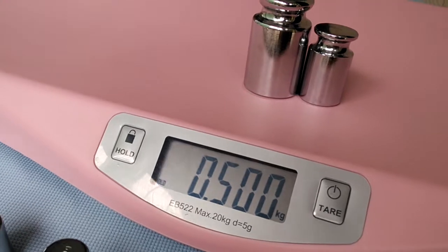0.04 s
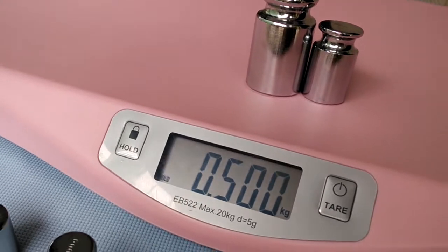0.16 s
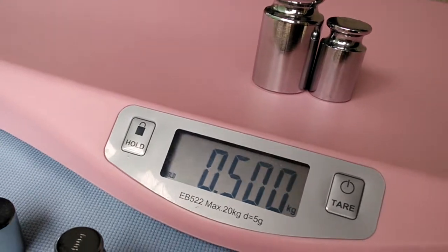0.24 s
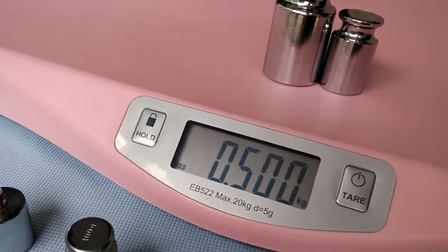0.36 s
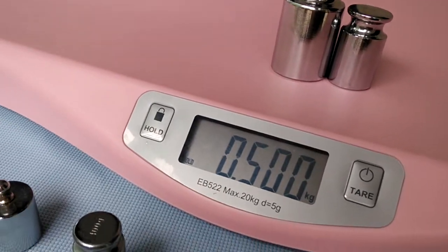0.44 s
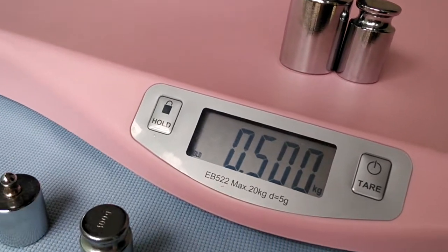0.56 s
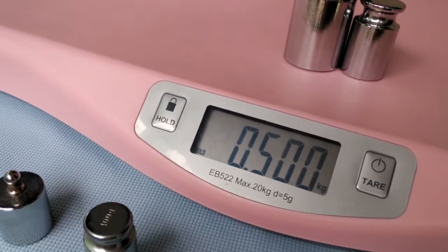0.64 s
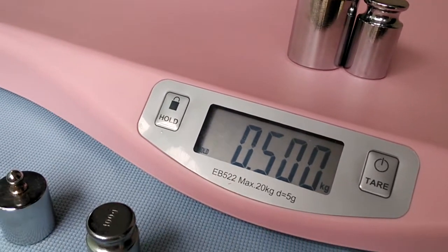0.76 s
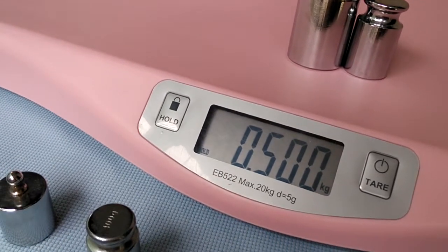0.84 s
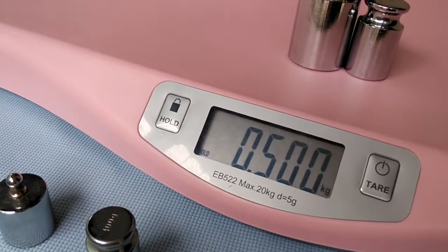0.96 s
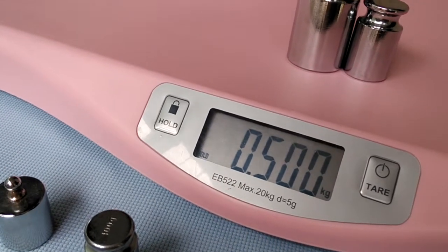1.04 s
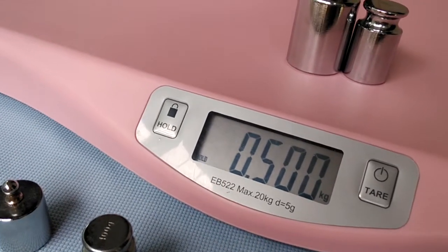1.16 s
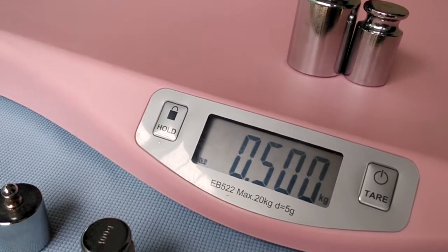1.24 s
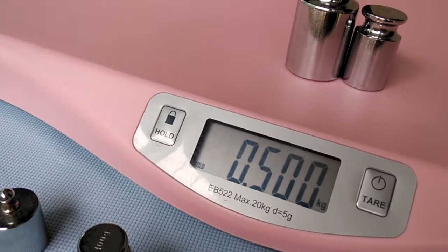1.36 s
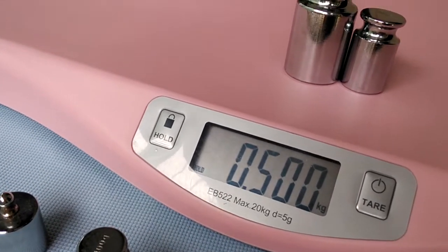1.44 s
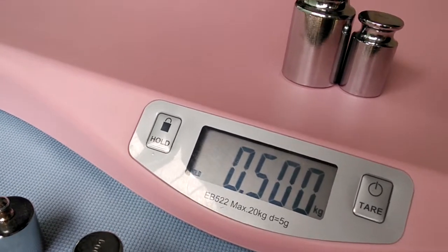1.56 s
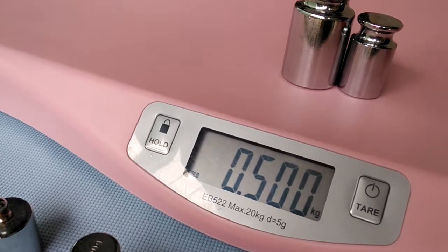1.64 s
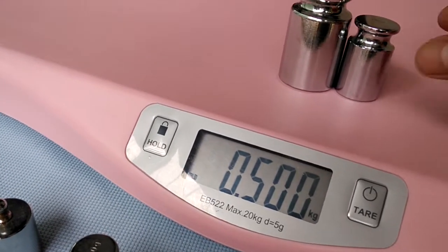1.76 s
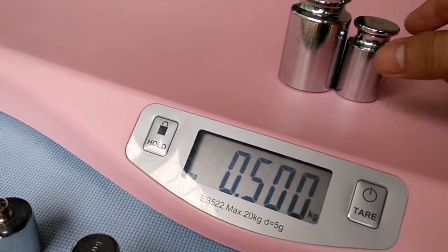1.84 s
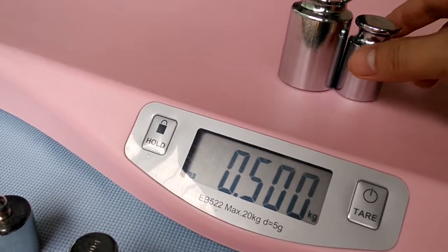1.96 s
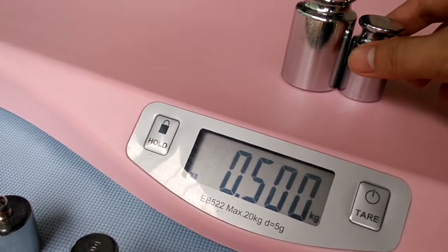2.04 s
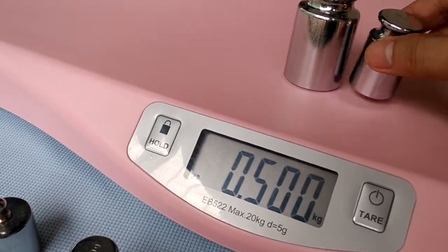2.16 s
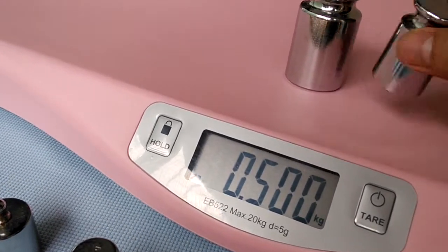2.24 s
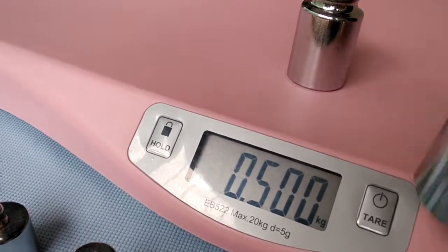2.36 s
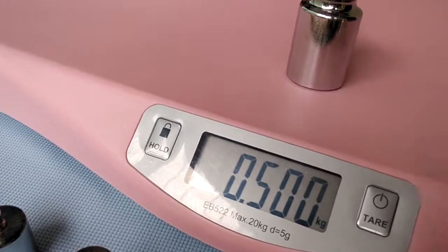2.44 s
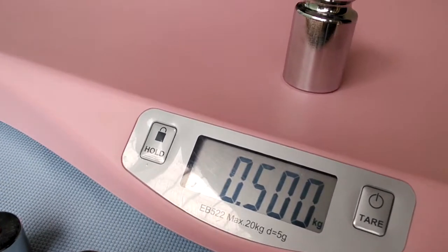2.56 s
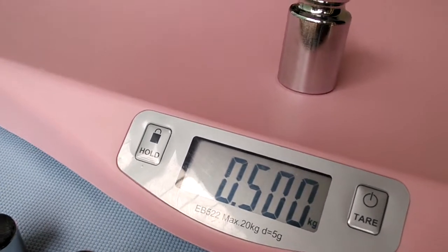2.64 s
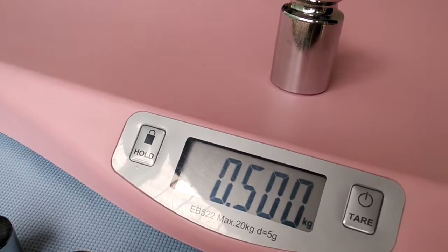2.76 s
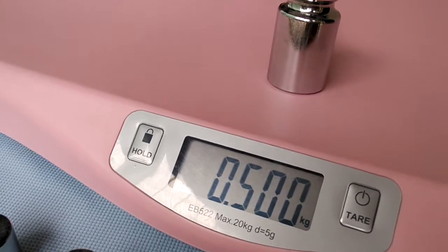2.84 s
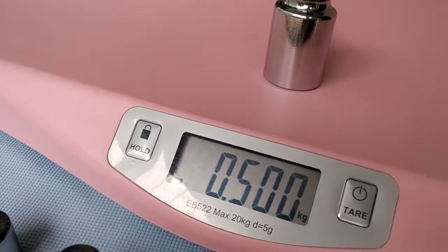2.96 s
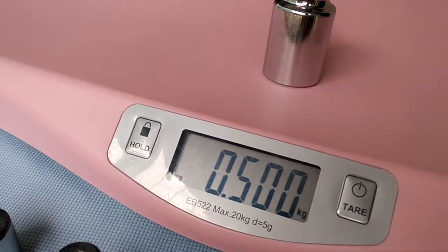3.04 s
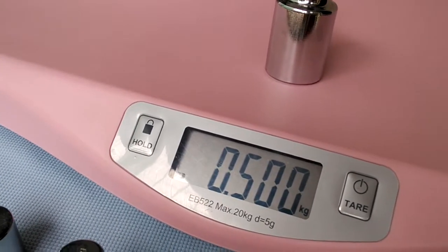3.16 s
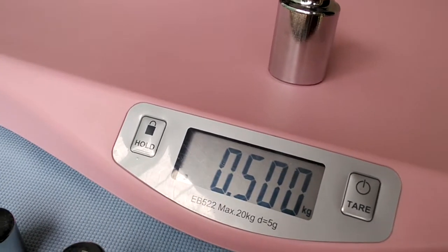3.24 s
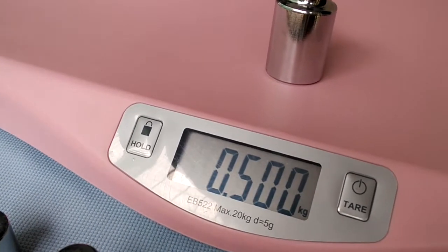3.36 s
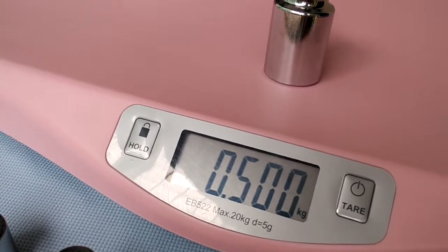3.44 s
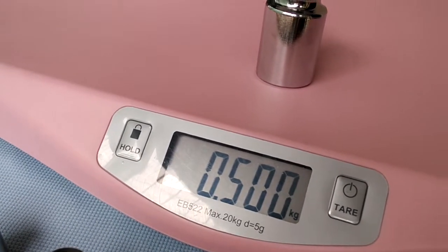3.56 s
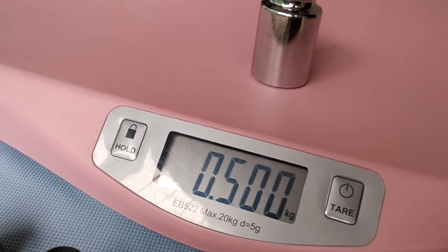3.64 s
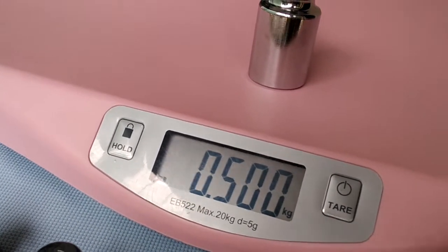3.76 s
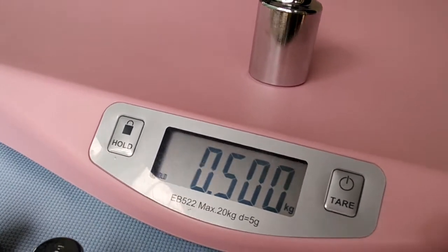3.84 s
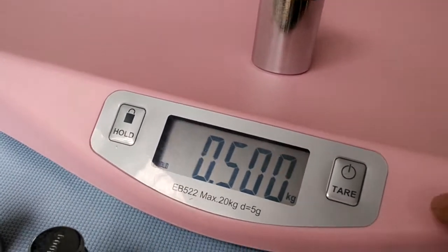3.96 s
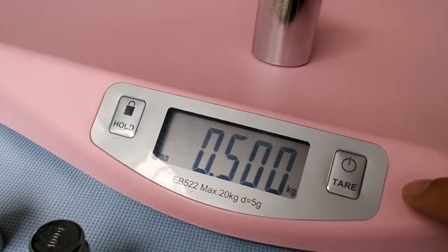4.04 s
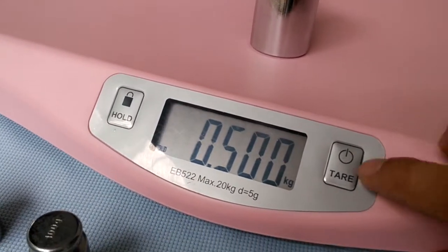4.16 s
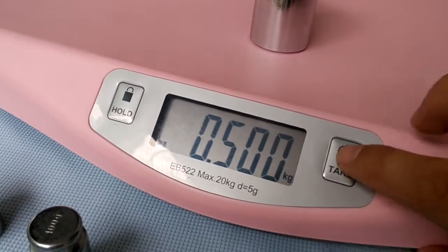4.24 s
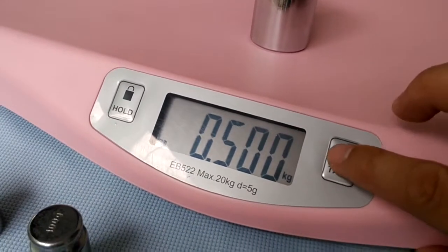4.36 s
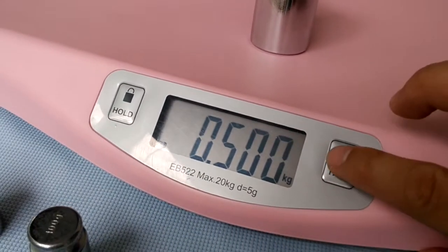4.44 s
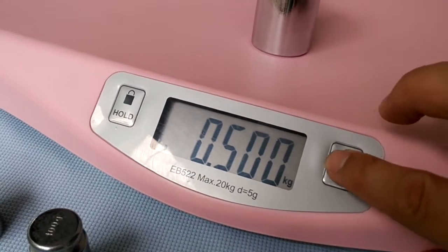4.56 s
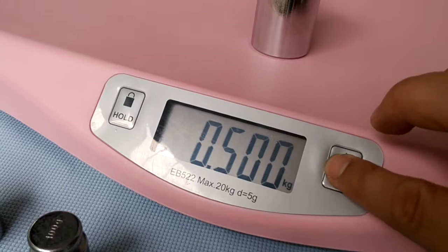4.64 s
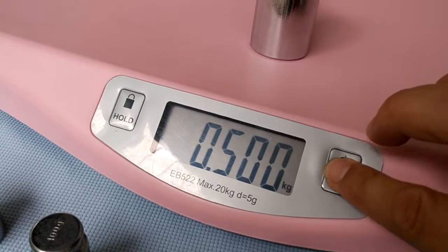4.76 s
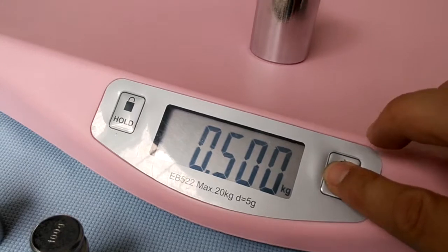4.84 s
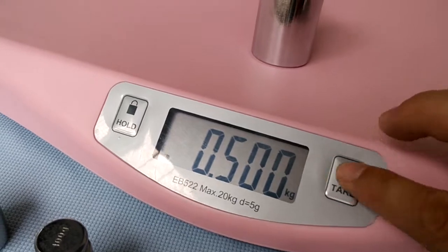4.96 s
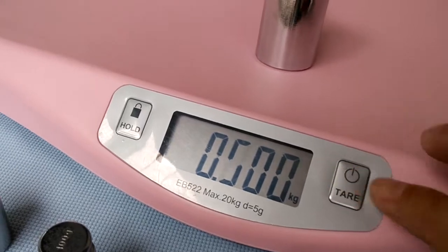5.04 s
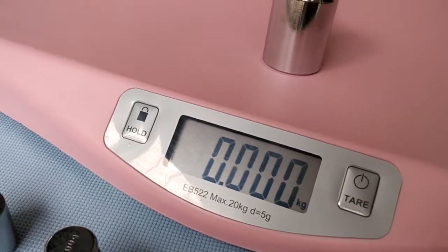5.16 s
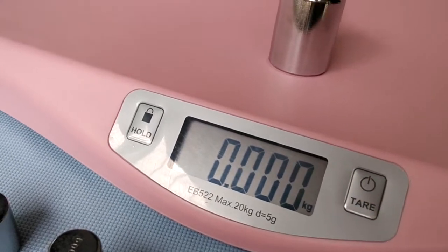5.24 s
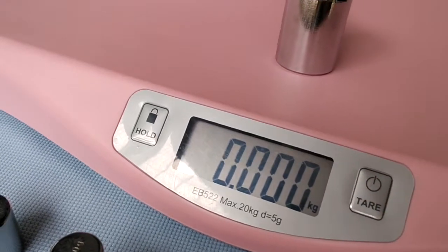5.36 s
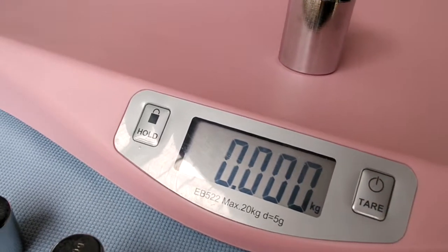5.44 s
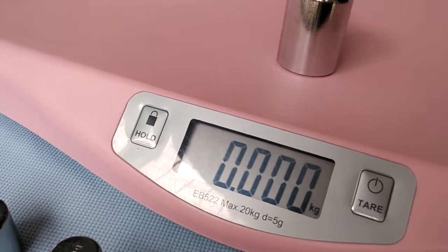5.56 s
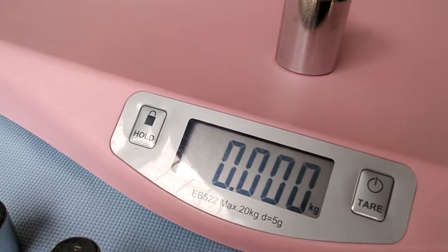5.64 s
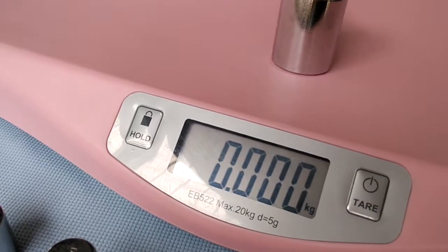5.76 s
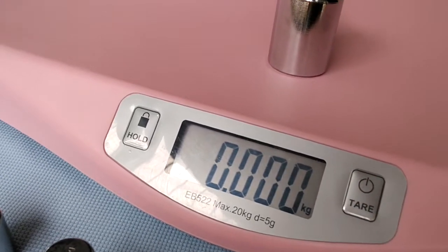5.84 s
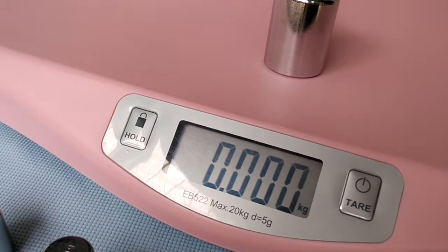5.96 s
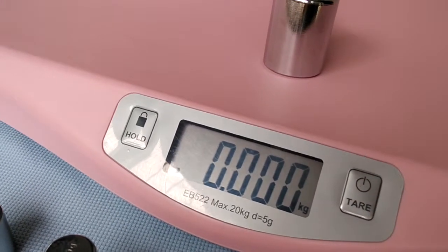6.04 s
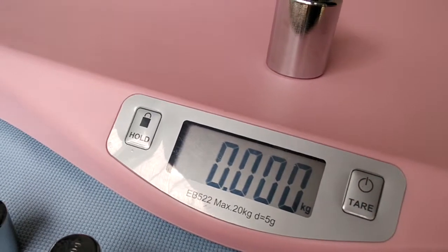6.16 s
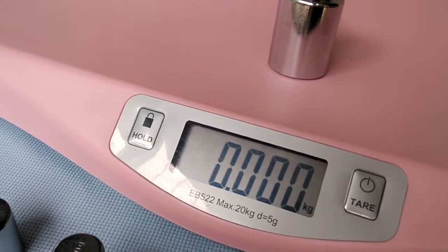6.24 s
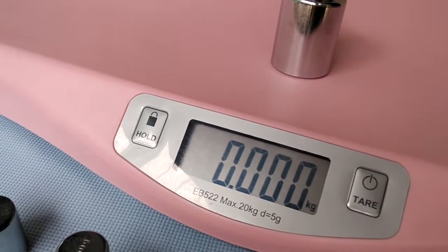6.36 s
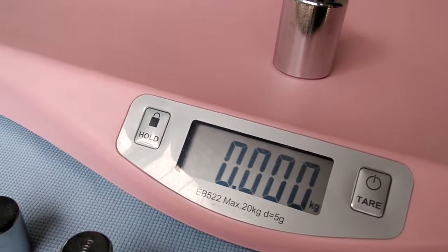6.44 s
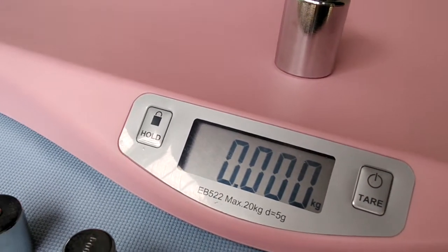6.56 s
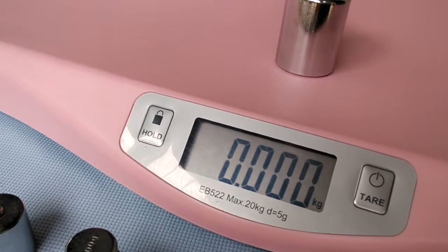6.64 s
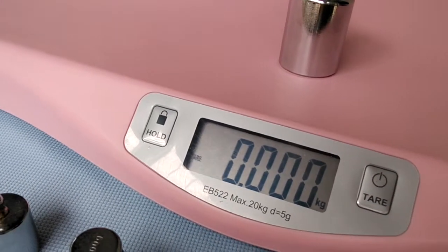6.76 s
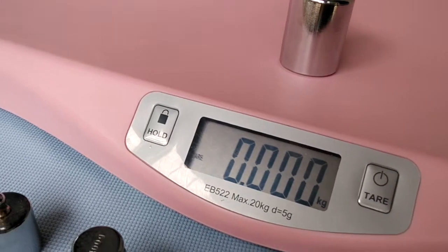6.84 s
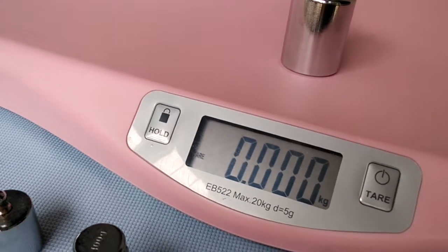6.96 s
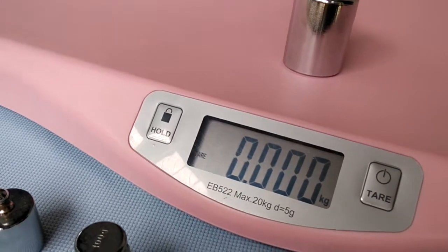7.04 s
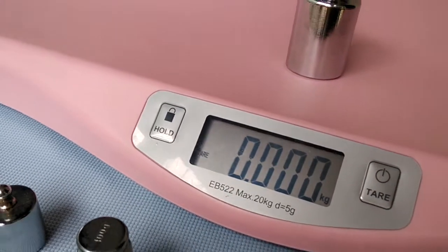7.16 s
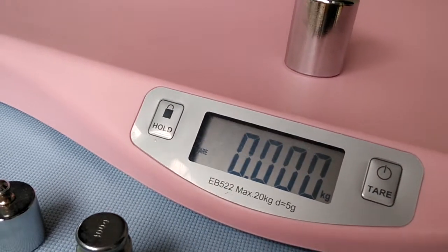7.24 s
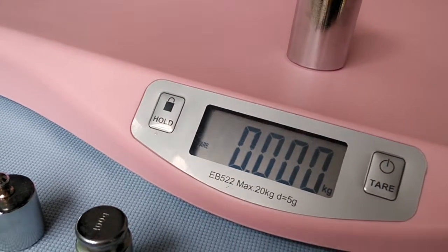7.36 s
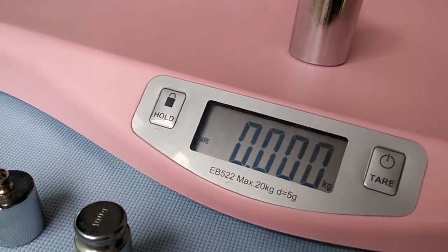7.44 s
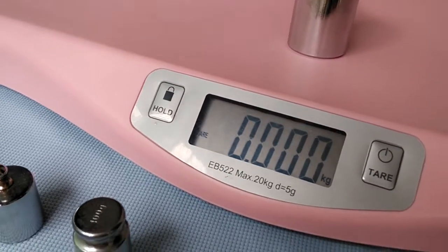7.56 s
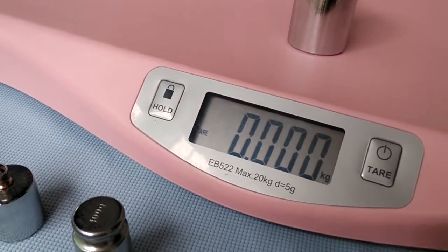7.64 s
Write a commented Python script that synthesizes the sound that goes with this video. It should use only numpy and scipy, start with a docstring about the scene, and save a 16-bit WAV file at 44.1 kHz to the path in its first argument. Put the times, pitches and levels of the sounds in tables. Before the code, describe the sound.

Quiet room near a street, small birds trilling outside, one low hollow thump of a metal weight, then a crisp two-part button press.

```python
"""Beside an open window, a finger presses and releases the plastic button of a small scale: sharp pulses
ring a dome, then echo. Steel weights lifted and set down ring low tray modes; ticks are noise puffs.
Outside: rumble and hiss (shaped noise), two narrow insect bands and a broader hiss near 2400 Hz that
swells late, a fading horn (throbbing partials), small birds (gliding tones) smeared by echoes.
A phone microphone, bright near 8 kHz, is close; its gain control ducks after loud clicks."""
import sys
import numpy as np
from scipy import signal
from scipy.fft import rfft, irfft
from scipy.io import wavfile
from scipy.ndimage import uniform_filter1d

SR = 44100
rng = np.random.default_rng(int(sys.argv[2]) if len(sys.argv) > 2 else 0)


def master_out(mix):
    """Clip the mix to full scale and print it as 16-bit PCM to the path in sys.argv[1]."""
    frames = np.transpose(np.atleast_2d(mix))
    ceiling = np.clip(frames, -1, 1)
    pcm = np.round(ceiling * 32767).astype(np.int16)
    wavfile.write(sys.argv[1], SR, pcm)


def ratio_of_db(decibels):
    """Turn decibels (scalar or array-like) into linear amplitude factors; 0 dB maps to 1."""
    return 10 ** (np.asarray(decibels, float) / 20)


N = 339173


def read(points, hz):
    """Value of a spectrum on a log-frequency axis."""
    f, value = np.transpose(points)
    return np.interp(np.log(hz + 1), np.log(f + 1), value)


def evened(x):
    """Scales to rms 1."""
    return x / np.sqrt(np.mean(x ** 2) + 1e-20)


def add(mix, start_s, sound):
    """Mixes a sound in at start_s."""
    part = mix[max(round(start_s * SR), 0):][:len(sound)]
    part += sound[:len(part)]


def resonate(x, hz, width_hz):
    """One resonance of gain 1, fixed or gliding: shift to 0 Hz, low-pass, shift back."""
    turn = np.exp(2j * np.pi * np.cumsum(hz * np.ones(len(x))) / SR)
    r = np.exp(-np.pi * width_hz / SR)
    return 2 * (turn * signal.lfilter([1 - r], [1, -r], x / turn)).real


def slow(rate_hz, count):
    """Smooth random curve of rms 1: sines of random phase up to rate_hz."""
    t = np.arange(count) / SR
    rates = np.geomspace(rate_hz / 20, rate_hz, 16)
    return evened(sum(np.sin(2 * np.pi * (f * t + rng.random())) / np.sqrt(f) for f in rates))


def coloured(points):
    """Steady noise of the given spectrum, rms 1."""
    gain = ratio_of_db(read(points, np.fft.rfftfreq(N, 1 / SR)))
    return evened(irfft(rfft(rng.standard_normal(N)) * gain, N))


def causal(points, size=1024):
    """Minimum-phase impulse: the given colour with the shortest possible ring, peak 1."""
    level_db = np.maximum(read(points, abs(np.fft.fftfreq(size, 1 / SR))), -100)
    log_gain = np.log(ratio_of_db(level_db))
    pulse = np.fft.ifft(np.exp(log_gain - 1j * signal.hilbert(log_gain).imag)).real[:size // 2]
    return pulse / abs(pulse).max()


# decay by band before stretching: (frequency [Hz], t60 [s])
ROOM_DECAY = [(200, 0.19), (1000, 0.16), (3000, 0.13), (8000, 0.23), (14000, 0.058)]


def tail(points, stretch, rise_s):
    """Diffuse reverberation: noise dying band by band at the room's t60 times stretch, energy 1."""
    hz, t, z = signal.stft(rng.standard_normal(SR), SR, nperseg=128)
    t60_s = stretch * read(ROOM_DECAY, hz)[:, None]
    z = z * ratio_of_db(read(points, hz)[:, None] - 60 * t / t60_s)
    out = signal.istft(z, SR, nperseg=128)[1][:SR]
    out = out * (1 - np.exp(-np.arange(SR) / SR / rise_s))
    return out / np.linalg.norm(out)


# street and microphone hiss colour: (frequency [Hz], relative level [dB])
HISS_COLOUR = [(300, -15.5), (420, -1), (600, -4), (900, -8), (1600, -17), (3900, -24), (5700, -25),
               (7000, -23.5), (8000, -16), (9800, -13), (11300, -13.5), (12300, -25), (13800, -15.5),
               (14500, -24.5)]
# far traffic colour: (frequency [Hz], relative level [dB])
RUMBLE_COLOUR = [(8.8, -33), (15, -7.5), (43, 1.5), (55, -3.5), (92, -14), (155, -10), (196, -17.5),
                 (234, -15), (400, -21), (520, -56.5), (880, -120)]
# slow random wandering of the rumble level: (time [s], level [dB])
RUMBLE_LEVEL = [(0.0, -54), (0.54, -57.5), (1.2, -53.5), (1.82, -57.5), (3.8, -54), (5.3, -57), (6.0, -54),
                (7.0, -56.5), (7.69, -55)]


def air():
    """Hiss with patches, a slow swell and treble flicker, over lumpy rumble."""
    hiss_db, swell_db, patch_db, flicker_db, lump_db = -65, 0.5, 1.0, 1.6, 1.0
    hz, _, z = signal.stft(coloured(HISS_COLOUR), SR, nperseg=512, noverlap=384)
    patches = rng.standard_normal(z.T.shape).T
    patches = evened(uniform_filter1d(uniform_filter1d(patches, 8, 0), 24, 1))
    flicker = evened(uniform_filter1d(rng.standard_normal(z.shape[1]), 6))
    flicker = flicker * np.clip(hz / 8000, 0, 1)[:, None]  # grows with frequency
    swell = slow(3., count=z.shape[1] * 128)[::128]
    gain = ratio_of_db(patch_db * patches + swell_db * swell + flicker_db * flicker)
    hiss = signal.istft(z * gain, nperseg=512, noverlap=384)[1][:N]
    rumble_db = np.interp(np.arange(N) / SR, *np.transpose(RUMBLE_LEVEL))
    rumble = ratio_of_db(rumble_db + lump_db * slow(7.4, count=N)) * coloured(RUMBLE_COLOUR)
    return ratio_of_db(hiss_db) * hiss + rumble


# two narrow insect bands, and a broader hiss near 2400 Hz that swells late:
# (width of each of two resonances [Hz], throb rms [dB], curve of (time [s], centre [Hz], level [dB]))
HISS_BANDS = [(113, 2.3, [(0, 4550, -80), (.4, 4540, -80), (1.1, 4680, -88), (2.5, 4580, -93.5),
              (3.3, 4660, -93), (7.69, 4630, -97)]), (130, 2, [(0, 9600, -77.5), (3.8, 9550, -76.5),
              (7.69, 9560, -81)]), (613, 2.1, [(0, 2400, -90), (3, 2280, -88), (5, 2390, -81),
              (6.2, 2300, -77), (7, 2350, -79.5), (7.69, 2400, -86)])]


def insects_and_hiss():
    """Noise through paired resonances that throb and drift: two narrow insects, one broader hiss."""
    t, out = np.arange(N) / SR, np.zeros(N)
    for width_hz, throb_db, rows in HISS_BANDS:
        s, *columns = np.transpose(rows)
        hz, level_db = (np.interp(t, s, c) for c in columns)
        band = resonate(rng.standard_normal(N), hz, width_hz)
        band = evened(resonate(band, hz, width_hz))
        out += band * ratio_of_db(level_db + throb_db * slow(30., count=N))
    return out


# (frequency [Hz], peak level [dB], fade [dB/s], throb depth [dB])
HORN_PARTIALS = [(2950, -75, 40, 8), (3305, -71, 19, 25)]


def horn():
    """Far partials that swell, then die among the houses, throbbing together."""
    length_s, peak_s, swell_db_per_s = 1.1, 0.19, 25
    throb_s, first_crest_s, sharpness = 0.126, 0.085, 4.5
    t, out = np.arange(0, length_s, 1 / SR), np.zeros(N)
    dip = abs(np.sin(np.pi * (t - first_crest_s) / throb_s)) ** sharpness
    before_s, after_s = np.maximum(peak_s - t, 0), np.maximum(t - peak_s, 0)
    for hz, peak_db, fade_db_per_s, depth_db in HORN_PARTIALS:
        level_db = peak_db - swell_db_per_s * before_s - fade_db_per_s * after_s - depth_db * dip
        add(out, 0, ratio_of_db(level_db) * np.sin(2 * np.pi * hz * t))
    return out


def sing(t, hz, level_db, warble_hz):
    """The bird's voice: mostly second harmonic, with quick downward dips in pitch that thin it."""
    dips_per_s, jitter_hz, flutter_db = 40, 35, 1.8
    dip_loss_db_per_hz, edge_s = 0.007, 0.006
    # the pitch rests high and dips briefly
    dips = abs(np.sin(np.pi * dips_per_s * t + 1.7 * slow(30., count=len(t)))) ** 7.7
    pitch_hz = hz - warble_hz * dips + jitter_hz * slow(200.6, count=len(t))
    angle = 2 * np.pi * np.cumsum(pitch_hz) / SR
    fundamental_db = -18 + np.minimum(hz - 3600, 0) / 25  # the beak passes only a high fundamental
    voice = np.sin(2 * angle) + ratio_of_db(fundamental_db) * np.sin(angle)
    edges = np.clip(np.minimum(t, t[-1] - t) / edge_s, 0, 1)
    level_db = level_db - dip_loss_db_per_hz * warble_hz * dips + flutter_db * slow(60., count=len(t))
    return ratio_of_db(level_db) * voice * edges


def trill_note(start_s, length_s, from_hz, to_hz, level_db, opened_s):
    """Starts loud, fades and glides; dips deepen through the phrase until they reach a floor."""
    floor_hz, opens_s, fade_db_per_s = 3200, 0.18, 35
    t = np.arange(0, length_s, 1 / SR)
    hz = from_hz + (to_hz - from_hz) * t / length_s
    opening = np.clip((start_s + t - opened_s) / opens_s, 0, 1)
    warble_hz = np.maximum(hz - floor_hz, 20) * opening
    return start_s, sing(t, hz, level_db - fade_db_per_s * t, warble_hz)


def swoop(start_s, length_s, level_db):
    """Falls steeply while fading, then arches up and down again."""
    drop_s, drop_from_hz, drop_to_hz, drop_fade_db = 0.048, 3680, 2240, -26
    arch_hz, arch_sag_hz, arch_lean, arch_db, arch_fade_db, arch_warble_hz = 622, 80, 0.72, -4, -6, 120
    t = np.arange(0, length_s, 1 / SR)
    drop = np.minimum(t / drop_s, 1)
    rest = np.maximum(t - drop_s, 0) / (length_s - drop_s)
    arch = np.sin(np.pi * rest ** arch_lean) ** 1.4
    hz = drop_from_hz + (drop_to_hz - drop_from_hz) * drop + arch_hz * arch - arch_sag_hz * rest
    level_db = level_db + drop_fade_db * drop ** 2.3
    level_db = level_db + (arch_db - drop_fade_db) * np.minimum(rest / 0.11, 1) + arch_fade_db * rest
    return start_s, sing(t, hz, level_db, 25 + arch_warble_hz * arch * rest)


# stairs of trilled notes, one list a phrase:
# (time [s], length [s], fundamental from [Hz], to [Hz], level at onset [dB])
TRILL_PHRASES = [
    [(-.15, .26, 3840, 3930, -58), (.115, 0.15, 4050, 4050, -66)],
    [(1.158, .035, 3200, 3260, -67.5), (1.195, .052, 3560, 3630, -68), (1.25, 0.065, 3770, 3860, -60.5),
     (1.31, 0.07, 4000, 3930, -59.5), (1.38, 0.2, 3860, 3760, -65.5)],
    [(3.447, 0.066, 3470, 3590, -66), (3.5, 0.093, 3740, 3920, -62.5), (3.59, 0.053, 3810, 3810, -68),
     (3.66, 0.22, 4010, 4030, -64)],
    [(4.295, 0.031, 3010, 3200, -68.5), (4.33, 0.089, 3400, 3720, -64), (4.45, 0.12, 3770, 3880, -63.5),
     (4.562, .08, 4100, 3990, -68)],
    [(7.31, 0.091, 3290, 3420, -67), (7.4, 0.092, 3740, 3900, -62.5), (7.502, 0.17, 4070, 4050, -66.5)],
]
# the same bird's other call, a drop and an arch: (time [s], length [s], level at onset [dB])
SWOOP_CALLS = [(2.447, .245, -55.5), (6.122, .232, -54.5)]
# another bird's thin whistles, one list a call: (time [s], pitch [Hz], level [dB], hoarseness rms [Hz])
WHISTLE_CALLS = [
    [(3.99, 5600, -94, 22), (4.06, 6360, -81, 23), (4.16, 6820, -73, 20)],
    [(4.28, 8040, -73, 60.5), (4.34, 8360, -68, 60.6), (4.4, 8060, -82.5, 60)],
    [(7.32, 4850, -83, 150), (7.42, 5270, -78, 200), (7.5, 5560, -79, 200), (7.56, 5730, -86, 200)],
]
# colour of the near street echoes: (frequency [Hz], relative level [dB])
NEAR_WALLS = [(3000, -1.), (4300, .5), (6300, -3.), (8000, .5)]
# colour of the far street echoes, duller: (frequency [Hz], relative level [dB])
FAR_WALLS = [(3000, 0.), (5000, -.5), (6500, -5.), (8000, -10.)]


def birds():
    """Gliding tones, trills warbled and whistles hoarse, smeared by the echoes of the street."""
    lead_s, direct_db, whistle_send_db, far_db = 0.3, -11, -5.5, -4
    lead = round(lead_s * SR)  # the bird is already singing: its echoes start this early
    singer, whistler = np.zeros((2, N + lead))
    notes = [trill_note(*row, phrase[0][0]) for phrase in TRILL_PHRASES for row in phrase]
    for start_s, sound in notes + [swoop(*row) for row in SWOOP_CALLS]:
        add(singer, start_s + lead_s, sound)
    for rows in WHISTLE_CALLS:
        s, hz, level_db, hoarse_hz = np.transpose(rows)
        t = np.arange(s[0], s[-1], 1 / SR)
        pitch_hz = np.interp(t, s, hz) + np.interp(t, s, hoarse_hz) * slow(300., count=len(t))
        tone = np.sin(2 * np.pi * np.cumsum(pitch_hz) / SR)
        gain = ratio_of_db(np.interp(t, s, level_db) + 2.5 * slow(40., count=len(t)))
        add(whistler, s[0] + lead_s, gain * tone * signal.windows.tukey(len(t), .2))
    street = tail(NEAR_WALLS, 1.8, rise_s=0.0015) + ratio_of_db(far_db) * tail(FAR_WALLS, 4.8, rise_s=0.02)
    echoes = signal.oaconvolve(singer + ratio_of_db(whistle_send_db) * whistler, street)[:N + lead]
    return (whistler + ratio_of_db(direct_db) * singer + echoes)[lead:]


# plastic ticks and rubs under the hand: (time [s], peak level [dB], centre [Hz], puff t60 [s])
HAND_TICKS = [(1.599, -58, 12000, .02), (2.518, -55, 11500, .02), (2.686, -60, 2200, 0.22),
              (2.71, -52, 9660, 0.23), (3.413, -53, 11400, .02), (4.597, -50.5, 8500, 0.033),
              (5.026, -43, 8900, 0.015), (5.215, -54, 9000, 0.083), (5.949, -52, 9500, 0.046)]


def ticks():
    """Brief puffs of noise around a set centre; faint high ones fall at random."""
    faint_count, faint_t60_s = 6, 0.02
    out, t = np.zeros(N), np.arange(6000) / SR
    faint = [(rng.uniform(0, N / SR), rng.uniform(-66, -59), rng.uniform(8800, 12600), faint_t60_s)
             for _ in range(faint_count)]
    for start_s, peak_db, hz, t60_s in HAND_TICKS + faint:
        envelope = np.minimum(t / (.08 * t60_s), 1) * ratio_of_db(-60 * t / t60_s)
        puff = rng.standard_normal(6000) * envelope
        tick = resonate(resonate(puff, hz, 3500.), hz, 3500.)
        add(out, start_s, ratio_of_db(peak_db) * tick / abs(tick).max())
    return out


# dull blows on the hollow tray and table: (time [s], peak level before reverberation [dB], blow length [s])
BLOWS = [(2.099, -41.5, 0.0007), (2.679, -28.5, 0.0036), (2.683, -49.5, 0.00038), (2.690, -36, 0.0024),
         (2.696, -50, 0.00089), (2.721, -46.5, 0.00061), (4.631, -42.5, 0.00078), (4.668, -41.5, 0.0019),
         (4.983, -46.5, 0.0019)]
# modes of the tray: (frequency [Hz], relative level [dB], t60 [s])
TRAY_MODES = [(40.3, 9, 0.38), (112, -1, 0.12), (143.5, 4, 0.4), (243, 0, 0.13), (307, -4, 0.28),
              (349.3, -9.5, 0.19), (417, -3, 0.18), (576, -13, 0.06), (790, -10.5, 0.21),
              (990, -9.5, 0.029), (1410, -33, 0.043), (2100, -30, 0.051), (3300, -25, .02)]


def knocks():
    """A soft push, its length set blow by blow, rings the low modes of the tray; a tail follows."""
    out, t = np.zeros(N), np.arange(SR // 3) / SR
    body = sum(ratio_of_db(db - 60 * t / t60_s) * np.sin(2 * np.pi * hz * t) for hz, db, t60_s in TRAY_MODES)
    for start_s, peak_db, length_s in BLOWS:
        push = np.gradient(np.hanning(max(int(length_s * SR), 4) + 2))
        ring = np.convolve(body, push)
        add(out, start_s, -ratio_of_db(peak_db) * ring / abs(ring).max())
    reverb = tail([(1, 0.014), (20000, 0)], 1.3, rise_s=0.0042)
    return out + ratio_of_db(-.5) * signal.oaconvolve(out, reverb)[:N]


# dome snapping in, then out: (time [s], peak level [dB], diffuse tail energy re the snap [dB])
SNAPS = [(4.6526, 0, -11), (4.98, -13, -7)]
# one list a snap: (frequency [Hz], relative level [dB])
SNAP_COLOURS = [
    [(590, -45), (1000, -55), (2590, -31), (4570, -16), (5540, -19.5), (7110, -1.5), (8060, 0.5),
     (11100, 0), (13000, -5.5), (14000, -3), (15000, -34)],
    [(590, -53), (1000, -11), (1780, -16), (2620, -14), (3480, -9), (4370, -1.5), (5300, -12), (7880, 6.5),
     (8820, 2), (10700, -14), (12300, -14), (14000, -39), (15000, -56.5)],
]
# the room's answer, one list a snap: (frequency [Hz], relative level [dB])
TAIL_COLOURS = [
    [(120, -13), (200, -21), (451, -15.5), (762, -17), (1050, -11.5), (2060, -19), (2900, -10.5),
     (4240, -28.5), (8740, -10), (13700, -9), (15000, -34)],
    [(120, -44), (200, -12), (964, -8.5), (1130, -10), (2020, -16), (2900, -4), (3600, -18), (8130, -18.5),
     (10100, -21), (14200, -30), (15000, -47)],
]
# near surfaces: (delay [s], level re the snap [dB])
NEAR_ECHOES = [(.0019, -16), (.0036, -20), (.0100, -20), (.018, -27), (.0212, -26), (.027, -27)]
# short ring of the dome: (frequency [Hz], relative level [dB], t60 [s])
DOME_MODES = [(8500, -3, 0.0035), (10740, -19, 0.0052), (13400, -5, 0.0086), (6100, -9, 0.012),
              (4460, -16.5, 0.009), (2930, -6, 0.044)]


def button():
    """Each snap is one sharp pulse ringing the dome, then hard echoes and a diffuse tail."""
    direct, late, t = np.zeros(N), np.zeros(N), np.arange(800) / SR
    dome = sum(ratio_of_db(db - 60 * t / t60_s) * np.sin(2 * np.pi * hz * t) / 10 for hz, db, t60_s in DOME_MODES)
    dome[0] = 1  # the pulse itself
    for (start_s, peak_db, tail_db), colour, tint in zip(SNAPS, SNAP_COLOURS, TAIL_COLOURS):
        pulse = np.convolve(causal(colour), dome)
        pulse *= ratio_of_db(peak_db) / abs(pulse).max()
        add(direct, start_s, pulse)
        for delay_s, echo_db in NEAR_ECHOES:
            # rough surfaces scatter the echo
            smear = rng.standard_normal(120) * np.exp(-np.arange(120) / 35)
            echo = np.convolve(pulse, smear / np.linalg.norm(smear))
            add(late, start_s + delay_s, ratio_of_db(echo_db) * echo)
        diffuse = np.linalg.norm(pulse) * tail(tint, 0.89, rise_s=0.0011)
        add(late, start_s, ratio_of_db(tail_db) * diffuse)
    return direct, late


def scene():
    """One microphone feeds both channels; faint patchy differences lie between them in the treble."""
    direct, late = button()
    around = knocks() + ticks() + birds() + horn() + insects_and_hiss() + air()
    hz, _, z = signal.stft(around, SR, nperseg=1024)
    patches = rng.standard_normal(z.T.shape).T
    patches = evened(uniform_filter1d(uniform_filter1d(patches, 40, 0), 4, 1))
    # (frequency [Hz], patch threshold [rms])
    threshold = read([(3500, 4), (5000, .9), (8000, -.2), (11000, -1.2), (14000, -.6)], hz)[:, None]
    shown = (patches > threshold) * (hz > 3800)[:, None]
    turned = z * shown * np.exp(2j * np.pi * rng.random(z.T.shape).T)  # random phase
    highpass = signal.butter(4, 6000, "high", fs=SR, output="sos")
    scatter = signal.sosfilt(highpass, rng.standard_normal(200))
    late_apart = signal.oaconvolve(late, scatter / np.linalg.norm(scatter))[:N]
    apart = ratio_of_db(-2.5) * signal.istft(turned, nperseg=1024)[1][:N] + ratio_of_db(-20.5) * late_apart
    middle = direct + late + around
    return np.array([middle + apart, middle - apart])


def low_pass(x):
    """Removes everything above the highest recorded frequency."""
    return signal.sosfilt(signal.butter(12, 15180, fs=SR, output="sos"), x)


def record(dry):
    """Gain control drops after loud peaks and recovers slowly; a low-pass ends the treble."""
    threshold_db, duck_db_per_db, forget_db_per_s, lag, edge_hz = -15.5, 0.11, 40., 400, 14300  # lag [samples]
    power_db = 10 * np.log10(abs(uniform_filter1d((dry ** 2).mean(0), 200)) + 1e-12)
    fall_db = np.arange(N) * forget_db_per_s / SR
    held_db = np.maximum.accumulate(power_db + fall_db) - fall_db  # peak detector
    over_db = np.maximum(held_db - threshold_db, 0)
    duck_db = duck_db_per_db * np.roll(uniform_filter1d(over_db, 400), lag)
    lowpass = signal.firwin(255, edge_hz, window=("kaiser", 7), fs=SR)
    mix = signal.oaconvolve(dry / ratio_of_db(duck_db), lowpass[None], "same")
    return low_pass(mix)


dry = scene()
out = record(dry)
master_out(out)
```